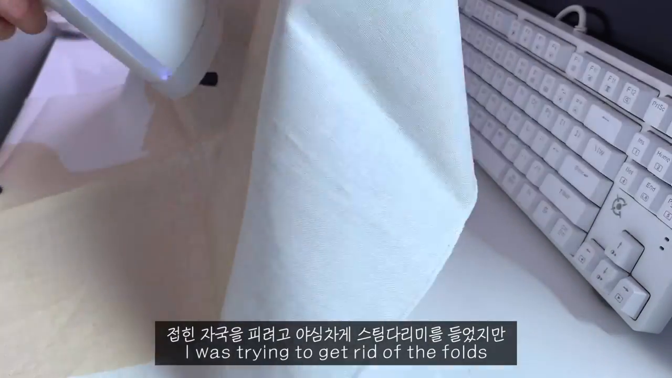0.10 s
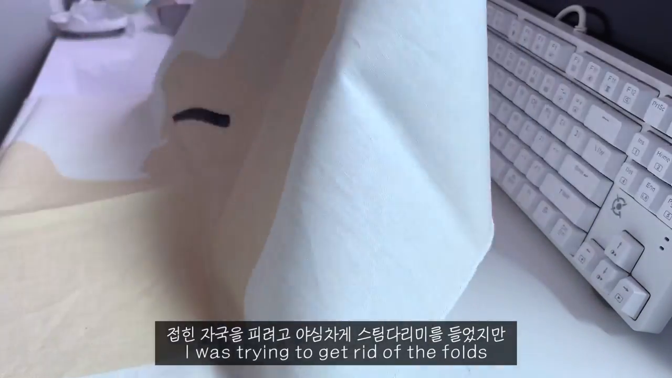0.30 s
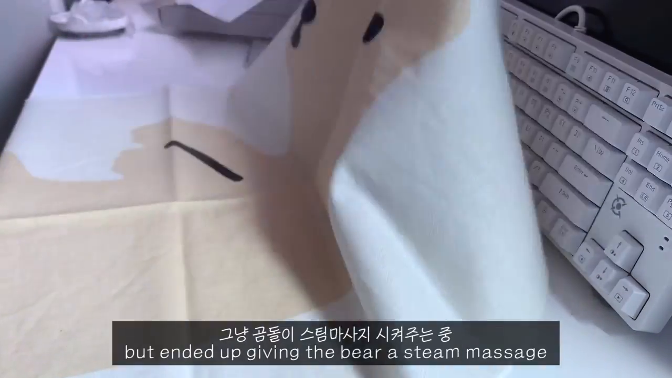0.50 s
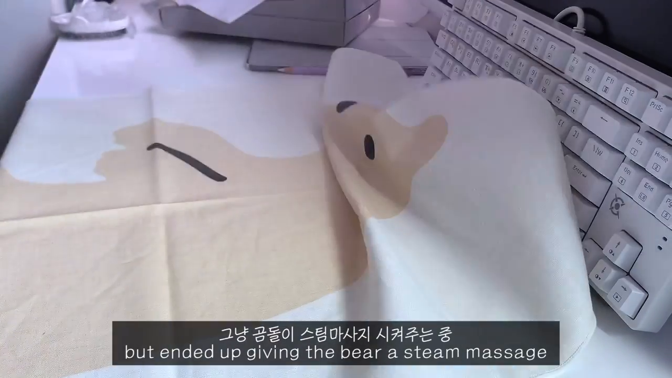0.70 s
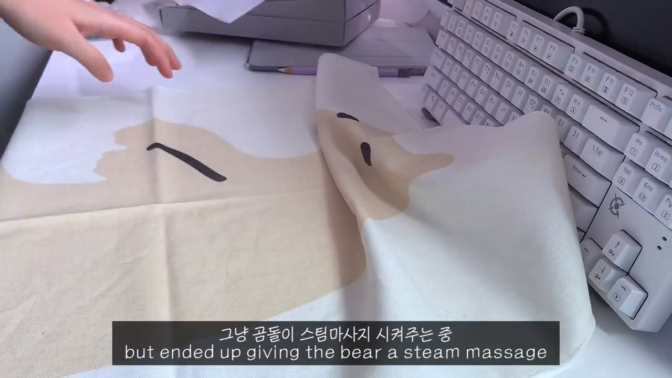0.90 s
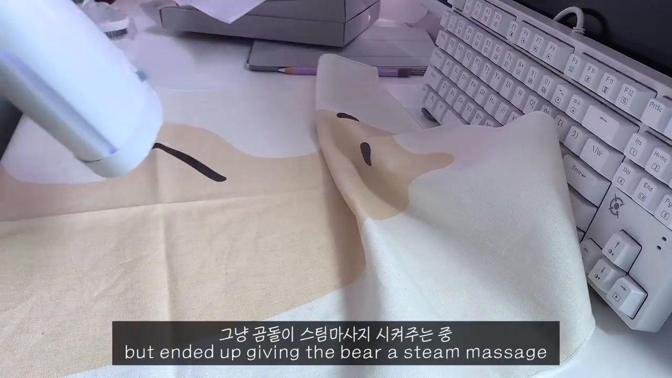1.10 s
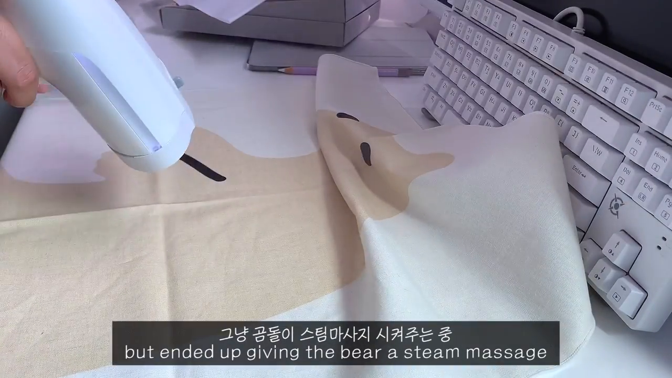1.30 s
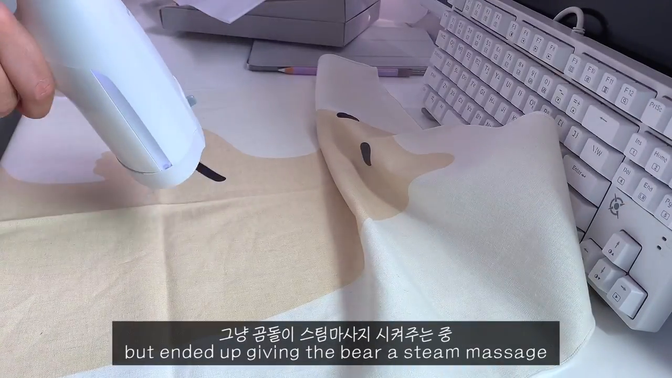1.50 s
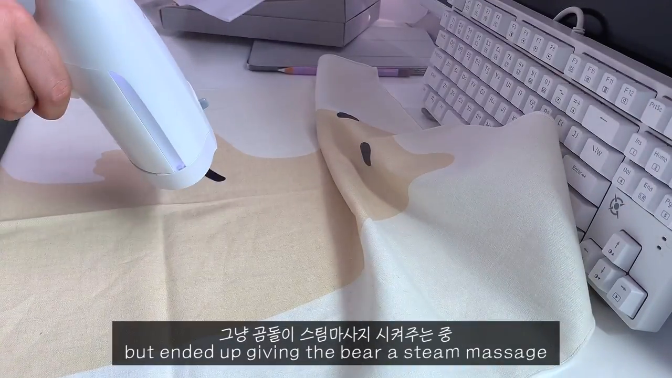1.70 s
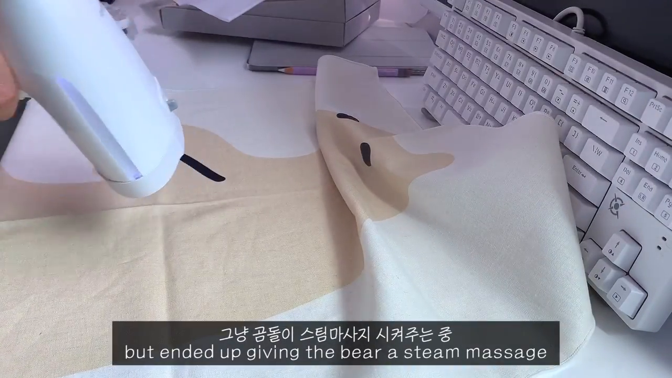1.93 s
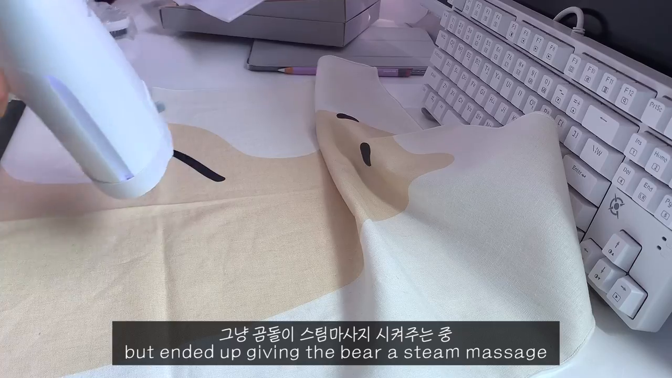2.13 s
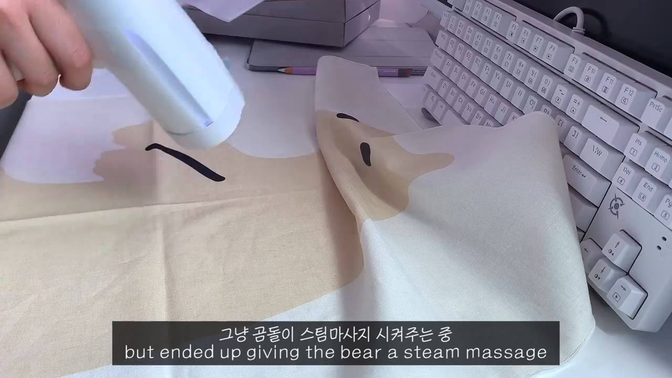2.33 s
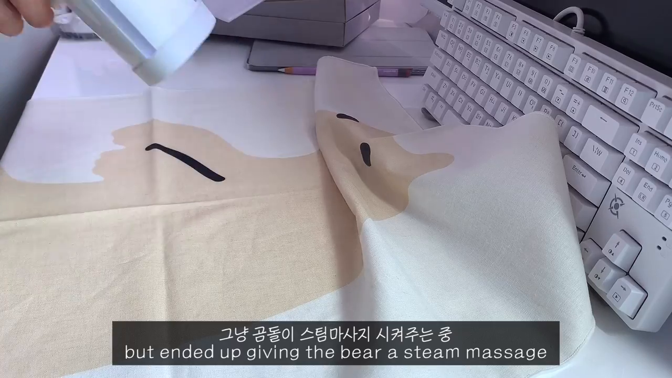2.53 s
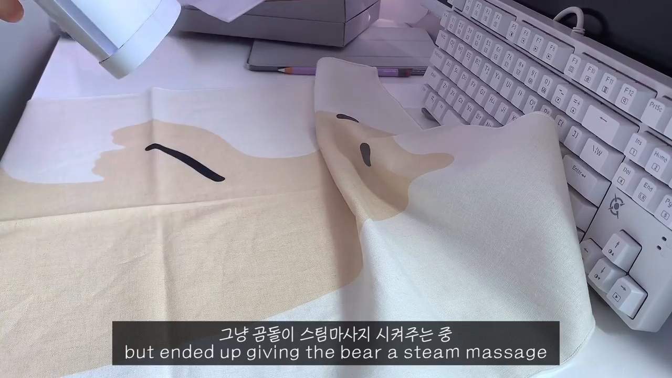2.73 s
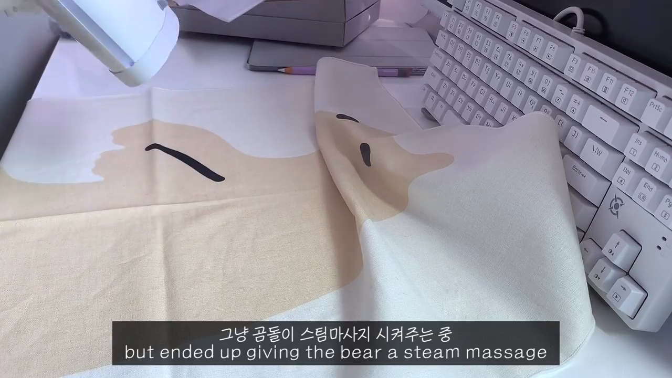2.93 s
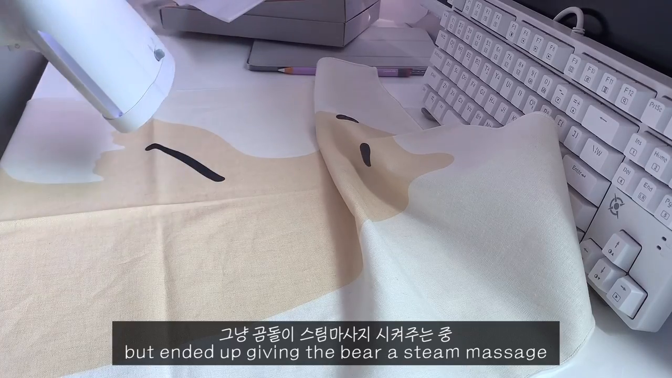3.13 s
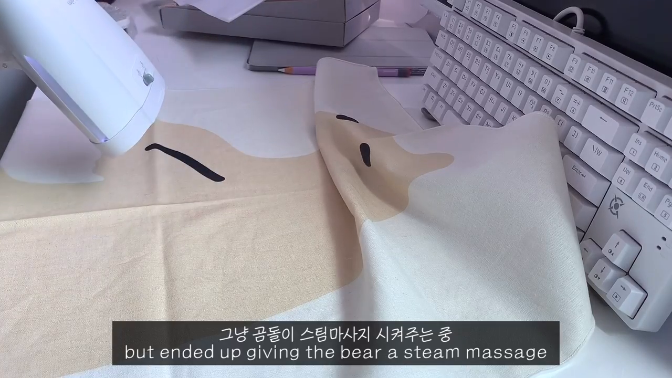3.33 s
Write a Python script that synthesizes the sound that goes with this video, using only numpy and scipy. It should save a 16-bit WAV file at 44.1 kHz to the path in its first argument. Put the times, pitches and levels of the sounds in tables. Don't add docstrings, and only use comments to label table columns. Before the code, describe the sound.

A steam jet hisses brightly onto fabric, swelling then easing, over a faint low room hum

```python
import sys
import numpy as np
from scipy import signal
from scipy.fft import rfft, irfft
from scipy.io import wavfile
from scipy.ndimage import uniform_filter1d

SR = 44100
rng = np.random.default_rng(int(sys.argv[2]) if len(sys.argv) > 2 else 0)


def convert_level_to_amplitude(level_db):
    exponent = np.asarray(level_db, float) / 20
    return 10 ** exponent


def output_pcm(signal):
    pcm = np.clip(np.atleast_2d(signal).T, -1, 1) * 32767
    wavfile.write(sys.argv[1], SR, np.round(pcm).astype(np.int16))


N = 147735


def evened(x):
    return x / np.sqrt(np.mean(abs(x) ** 2) + 1e-20)


def read(points, hz):
    f, value = np.transpose(points)
    return np.interp(np.log(hz + 1), np.log(f + 1), value)[:, None]


def along(table, t):
    rows = np.transpose(table)
    return [np.interp(t, rows[0], column) for column in rows[1:]]


def wander(rate_hz):
    hz = np.fft.rfftfreq(N, 1 / SR)
    slowed = rfft(rng.standard_normal(N)) / (1 + (hz / rate_hz) ** 2)
    return evened(irfft(slowed, N))


def patches(hz, t, depth_db, bins, frames):
    field = rng.standard_normal((len(hz), len(t)))
    field = uniform_filter1d(field, size=bins, axis=0)
    field = uniform_filter1d(field, size=frames, axis=1)
    return convert_level_to_amplitude(depth_db * evened(field))


# (frequency [Hz], lead [radians])
PORT_LEAD = [(0, 0), (500, -.7), (1200, -1.6), (2000, -2.1), (2620, -3.14), (3300, -4.4), (4600, -6.1),
             (5300, -5.2), (6300, -4.6), (7200, -3.1), (8000, -1.85), (16000, 9.05)]
# (frequency [Hz], likeness [0-1])
PORT_LIKENESS = [(50, .99), (300, .84), (1000, .64), (2700, .66), (4500, .52), (7200, .74), (8900, .99),
                 (15000, .995)]
# (frequency [Hz], left over right [dB])
PORT_BALANCE = [(100, -2), (400, -1.5), (1050, 6), (1900, .3), (4000, .2), (5800, -4.5), (7200, 2.2),
                (9000, 0)]
# (time [s], added likeness near the null [0-1], null [Hz], broadening of the null [0-1])
BEARING = [(.19, -0.25, 2320, .02), (.3, 0.27, 2370, .02), (.45, 0.6, 2010, 0.2), (.92, .2, 1800, 0.2),
           (1.02, 0.25, 2760, 0.46), (1.25, 0.19, 2500, 0), (1.5, 0.34, 2650, .1), (1.57, 0.35, 2620, 0.3),
           (1.8, 0.18, 2750, 0.65), (1.88, 0.43, 2620, 0), (2.42, 0.06, 2620, .1), (2.5, 0.34, 2530, 0.73),
           (2.75, 0.43, 2670, 0.88), (2.81, 0.036, 2600, 0), (2.97, -0.12, 2660, 0.6),
           (3.08, -0.14, 2640, 0), (3.35, 0.027, 2580, 0)]
NULL_HZ, JOIN_HZ, STEP_HZ = 2620, 4600, 8000
NULL_OCTAVES, BROAD_OCTAVES = 0.097, 0.53
STEP_TURN, SWAY = 0.32, 0.16


def ports(source, colour, size=512):
    overlap = size - size // 4
    hz, t, z = signal.stft(source, SR, nperseg=size, noverlap=overlap)
    f = hz[:, None]
    facing, null_hz, broad = along(BEARING, t)
    near = np.exp(-(np.log2((f + 1) / null_hz) / (NULL_OCTAVES + BROAD_OCTAVES * broad)) ** 2)
    same = np.clip(read(PORT_LIKENESS, hz) + facing * near, 0, 1)

    below = f * NULL_HZ / null_hz
    above = NULL_HZ + (f - null_hz) * (JOIN_HZ - NULL_HZ) / (JOIN_HZ - null_hz)
    seen_hz = np.where(f < null_hz, below, np.where(f < JOIN_HZ, above, f))
    lead = np.interp(seen_hz, *np.transpose(PORT_LEAD))
    high = f > STEP_HZ
    pull = (lead + np.pi) * np.clip(broad, 0, 1) * near
    lead = lead - pull - STEP_TURN * np.sin(2 * lead) * high
    lead = lead + SWAY * np.log(patches(hz, t, depth_db=2.5, bins=size // 40, frames=24)) * high

    right = (same * z[0] + np.sqrt(1 - same ** 2) * z[1]) * np.exp(1j * lead)
    balance = convert_level_to_amplitude(read(PORT_BALANCE, hz) / 2)
    z = np.array([z[0] * balance, right / balance]) * colour(hz, t)
    return signal.istft(z, SR, nperseg=size, noverlap=overlap)[1][:, :N]


# (frequency [Hz], level [dB per Hz])
HUM = [(18, -48), (38, -35), (50, 6.5), (75, -2), (105, -11.5), (150, -3.5), (330, -13.5), (1500, -17),
       (2300, -37), (6000, -32)]
# (time [s], level [dB])
HUM_SWELL = [(0.0, -47.5), (0.27, -46), (0.47, -50), (1.04, -46.5), (1.31, -53.5), (1.38, -45.5),
             (1.41, -58), (1.52, -50), (2.35, -52), (2.43, -52), (2.74, -53.5), (3.35, -52.5)]


def hum():
    def colour(hz, t):
        lows = convert_level_to_amplitude(read(HUM, hz)) * (hz[:, None] < 9000)
        return lows * patches(hz, t, depth_db=2.5, bins=1, frames=12)

    low = evened(ports(rng.standard_normal((2, N)), colour, size=4096))
    return convert_level_to_amplitude(along(HUM_SWELL, np.arange(N) / SR)[0] + 1.84) * low


def drone():
    pitch_hz, level_db, end_s, fade_s = 154, -50, 0.31, 0.045
    t = np.arange(N) / SR
    tone = np.sin(2 * np.pi * pitch_hz * t + 0.42 * wander(rate_hz=9))
    tone = tone * convert_level_to_amplitude(level_db + 3.0 * wander(rate_hz=5.2))
    fade = 1 / (1 + np.exp((t - end_s) / fade_s))
    return tone * fade * convert_level_to_amplitude([[-1], [1]])


# (time [s], desk echo delay [ms], echo share [0-1], echo leaning right [dB])
HAND = [(0, 0.54, 0.15, 8), (.2, 0.42, .45, 3), (.3, 0.61, 1, 7), (.45, 0.66, 0.89, 4.5),
        (.6, .77, 0.29, 11), (.75, 0.71, 1, 10.5), (.9, 0.57, .6, 7), (1.0, 0.37, 0.36, -2),
        (1.08, .28, 0.48, .1), (1.16, .2, 0.7, 2.5), (1.5, .17, 0.16, .1), (1.8, 0.21, 0.11, 2.5),
        (2.3, .15, 0.11, 6), (2.45, 0.28, 0.29, 1), (2.6, 0.36, 0.31, -7.5), (2.75, .35, 0.31, -3),
        (2.9, 0.3, 0.18, -6), (3.07, 0.16, 0.24, 3.7)]
# (time [s], delay [ms], echo
# share [0-1], treble beam [dB])
FOLD = [(.85, 1, 0.0087, -1.6), (.97, 1, 0.25, 1), (1.15, .71, 0.14, 5.5), (1.22, 0.66, 0.21, 6.5),
        (1.45, 0.71, 0.11, 5.5), (1.56, 0.59, 0.15, 4), (1.75, 0.49, 0.19, 2), (2.1, 0.7, 0.29, 5),
        (2.3, 0.6, 0.089, 7), (2.5, 0.48, 0.19, 0), (2.8, 0.56, 0.13, 1), (3.1, 0.63, 0.16, 3.5),
        (3.35, 0.64, 0.3, -.3)]
ECHO_EDGE_HZ, LEAN_EDGE_HZ = 9500, 9800
BEAM_HZ, BEAM_OCTAVES = 11900, 0.21


def echoes(hz, t):
    f = hz[:, None]
    desk_ms, desk, lean_db = along(HAND, t)
    fold_ms, fold, beam_db = along(FOLD, t)
    turn = -2j * np.pi * f / 1000
    desk = desk / np.sqrt(1 + (f / ECHO_EDGE_HZ) ** 4)
    lean = convert_level_to_amplitude(lean_db / (1 + (f / LEAN_EDGE_HZ) ** 6))
    shared = 1 + fold * np.exp(turn * fold_ms)
    beam = convert_level_to_amplitude(beam_db * np.exp(-(np.log2((f + 1) / BEAM_HZ) / BEAM_OCTAVES) ** 2))
    combs = []
    for share in (desk / lean, desk * lean):
        combs.append((shared + share * np.exp(turn * desk_ms)) / np.sqrt(1 + share ** 2))
    return beam * np.array(combs)


# (time [s], level [dB], dullness [dB per octave], cloth roar [dB])
FLOW = [(0.0, -67, 13, -5), (0.05, -54, 6.5, -19), (0.19, -52, 9, -21), (0.24, -27.5, 0.5, -63),
        (0.34, -26.5, 2, -25), (0.71, -24.5, 0.5, -29), (0.81, -26.5, 1.5, -36), (0.95, -31, 1.5, -41),
        (1.07, -33, 4.5, -15), (1.12, -31.5, 5, -8.5), (1.19, -18.5, 0.5, -22), (1.31, -19.5, 0.5, -22),
        (1.67, -20.5, -1, -16.5), (1.78, -24.5, -1.5, -19.5), (2.27, -26.5, -0.5, -20.5),
        (2.68, -24.5, -1, -30.5), (2.89, -31.5, 1, -28), (3.35, -34.5, 0.5, -18.5)]
# (frequency [Hz], level [dB per Hz])
JET = [(1000, -26.5), (2500, -11), (5500, -10), (7600, 4.5), (9500, 1), (11500, -7), (14500, -1),
       (16000, -7)]
PIVOT_HZ = 8640


def jet():
    spurts = convert_level_to_amplitude(0.85 * wander(rate_hz=590) + 0.58 * wander(rate_hz=17) + 0.5 * wander(rate_hz=2.4))

    def colour(hz, t):
        dull_db = along(FLOW, t)[1] * np.log2(PIVOT_HZ / (hz[:, None] + 300))
        hiss = convert_level_to_amplitude(read(JET, hz) + dull_db)
        return hiss * echoes(hz, t) * patches(hz, t, depth_db=2.03, bins=5, frames=30)

    hiss = evened(ports(spurts * rng.standard_normal((2, N)), colour))
    return convert_level_to_amplitude(along(FLOW, np.arange(N) / SR)[0] + 3.0) * hiss


# (frequency [Hz], level [dB per Hz])
ROAR = [(200, -10), (300, -10), (640, -2.5), (850, -3.5), (1500, -0.5), (2300, -4), (2900, -16),
        (5000, -70)]


def roar():
    level_db, _, roar_db = along(FLOW, np.arange(N) / SR)
    flutter = convert_level_to_amplitude(0.58 * wander(rate_hz=13))

    def colour(hz, t):
        return convert_level_to_amplitude(read(ROAR, hz)) * patches(hz, t, depth_db=3.7, bins=3, frames=30)

    rush = evened(ports(flutter * rng.standard_normal((2, N)), colour))
    return convert_level_to_amplitude(level_db + roar_db - 3.5) * rush


def scene():
    return hum() + drone() + jet() + roar()


def band_limit(x):
    return signal.sosfilt(signal.butter(12, 16960, fs=SR, output="sos"), x)


def record(dry):
    edge = signal.firwin(511, 15650, window=("kaiser", 9), fs=SR)
    mix = signal.oaconvolve(dry, edge[None], "same")
    return band_limit(mix)


dry = scene()
out = record(dry)
output_pcm(out)
```